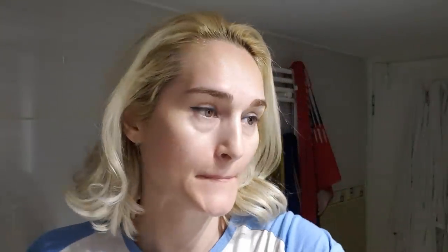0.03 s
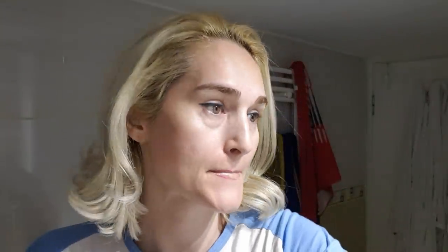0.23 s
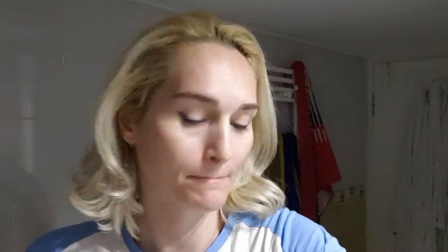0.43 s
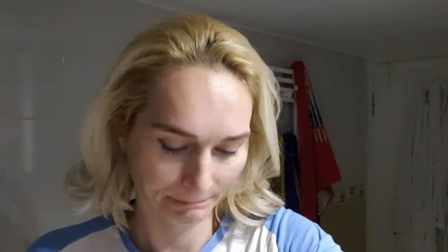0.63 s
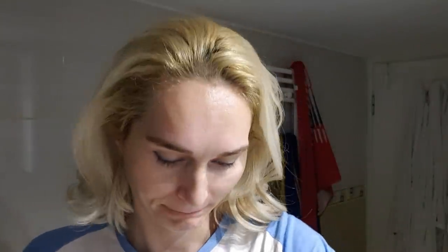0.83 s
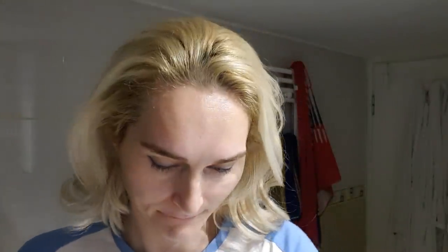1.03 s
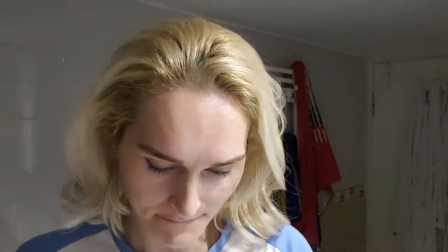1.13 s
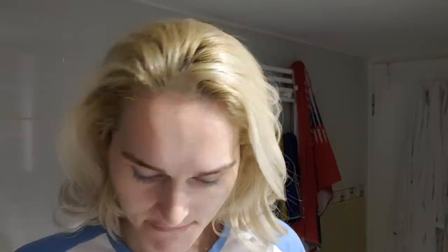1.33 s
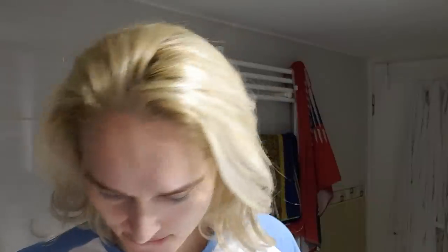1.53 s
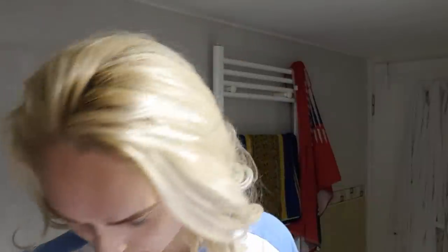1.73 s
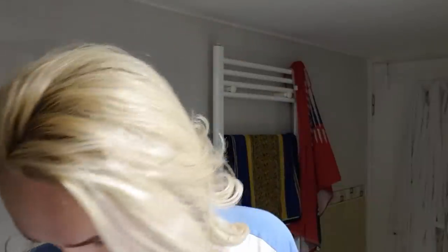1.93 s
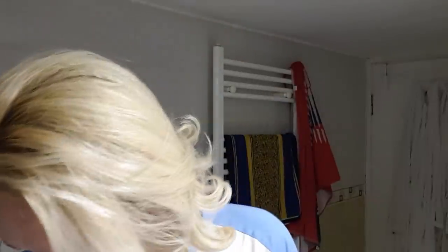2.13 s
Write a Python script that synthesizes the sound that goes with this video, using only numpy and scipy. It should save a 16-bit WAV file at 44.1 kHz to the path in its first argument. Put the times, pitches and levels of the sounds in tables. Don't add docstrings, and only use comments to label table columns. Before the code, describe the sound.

Bright irregular plastic clicks tumble quickly through a basin, knock its rim and stand, pause for a soft heel thud, then land and bounce on hard tiles. Close stereo pickup in a small echoing bathroom with faint hum.

```python
import sys
import numpy as np
from scipy import signal
from scipy.fft import rfft, irfft, next_fast_len
from scipy.io import wavfile
from scipy.ndimage import map_coordinates

SR = 44100
rng = np.random.default_rng(int(sys.argv[2]) if len(sys.argv) > 2 else 0)


def output_pcm(signal):
    pcm = np.clip(np.atleast_2d(signal).T, -1, 1) * 32767
    wavfile.write(sys.argv[1], SR, np.round(pcm).astype(np.int16))


def gain_from_decibels(decibels):
    exponent = np.asarray(decibels, float) / 20
    return 10 ** exponent


N = 95564

# start in seconds, cup level in dB, then basin boom, body and rim in dB over cup.
RATTLE = [(0.018, -45.5, -10.5, -10, -21.5), (0.0327, -33, -31, -5, -8),
          (0.0404, -23.5, -20.5, -0.5, -10.5), (.062, -34, 3, 6.5, 4.5), (0.0759, -23, -6, 7.5, -2.5),
          (.0815, -21.5, -7.5, -9.5, -17), (0.097, -32.5, 9, -2, -8.5), (0.1279, -12.5, -13, -2.5, -34),
          (0.1521, -8.5, -25.5, -4, -7), (.1597, -10.5, -21.5, -3, -18), (0.1881, -22.5, -8, -9, -17),
          (0.2144, -15.5, -12, 1, -6), (0.244, -38, 11.5, 6.5, -13), (0.27, -48.5, 17, -31.5, -18.5),
          (0.347, -61, -11, 1, -5), (0.506, -35.5, 2, 11.5, -4), (0.548, -36.5, -19.5, 7, 3.5)]
# centre in Hz, width in Hz, level in dB.
CUP_SIDE = [(3300, 290, -1.5), (3600, 500, 4.5), (4550, 570, 6.5), (5100, 500, 6.5), (5627, 830, 3.5),
            (8130, 1500, -2.5)]
# centre in Hz, width in Hz, level in dB.
BASIN_BODY = [(999, 46, 14), (1400, 87, 4.5), (1789, 91, 8), (2592, 800, 2.5), (3440, 710, 2)]
# centre in Hz, width in Hz, level in dB.
RIM = [(8686, 2580, -2), (10980, 900, 2), (11640, 660, 1.5), (12640, 2500, -7)]
IN_BASIN = dict(direct_db=(2, 2), walls_db=-18, chatter_db=9, tail_db=2, build=.015)


def rattle_in_basin(out):
    for s, db, boom_db, body_db, rim_db in RATTLE:
        strike(out, s, db, CUP_SIDE, boom_db, BASIN_BODY, body_db, RIM, rim_db, -22.5, IN_BASIN)


# start in seconds, cup level in dB, then boom, body and rim in dB over cup.
EDGE = [
    (0.482, -34.5, -5, -5.5, 9.5),
    (.488, -46, 16, 20, -2.5),
    (0.5701, -14.5, -18, -3.5, 3.5),
    (0.614, -35.5, -21.5, -7.5, -5),
    (0.759, -52, -3.5, 7.5, 1),
]
# centre in Hz, width in Hz, level in dB.
CUP_FLANK = [(3990, 530, 4.5), (4660, 500, 7.5), (5440, 940, 2.5), (6620, 550, -1)]
# centre in Hz, width in Hz, level in dB.
RIM_END_ON = [(9460, 1200, -1), (10460, 540, 5), (12100, 2700, -2.5)]
# centre in Hz, width in Hz, level in dB.
LIP = [(700, 100, 0), (955, 430, -2), (1540, 270, 6), (2420, 1100, 4), (3350, 770, -5.5)]
ON_EDGE = dict(direct_db=(2, 5), walls_db=2, chatter_db=7, tail_db=9, build=.02)


def knock_on_edge(out):
    for s, db, boom_db, body_db, rim_db in EDGE:
        strike(out, s, db, CUP_FLANK, boom_db, LIP, body_db, RIM_END_ON, rim_db, -15, ON_EDGE)


# start in seconds, cup level in dB, then flat crack, body and rim in dB over cup.
STAND = [
    (0.861, -10, -9.5, -35, 3.5),
    (.897, -22.5, -7, -22, -8.5),
]
# centre in Hz, width in Hz, level in dB.
CUP_TOP = [(4140, 990, 0.5), (5070, 720, 6.5), (5770, 700, 4), (7880, 1800, 0.5)]
ON_STAND = dict(direct_db=(1, 6), walls_db=3, chatter_db=2, tail_db=12, build=.012)


def knock_on_stand(out):
    for s, db, crack_db, body_db, rim_db in STAND:
        strike(out, s, db, CUP_TOP, -31.5, LIP, body_db, RIM, rim_db, crack_db, ON_STAND)


# start in seconds, cup level in dB, then flat crack, tile and rim in dB over cup.
SKIPS = [
    (1.429, -11.5, -1, -20, 9),
    (1.576, -50, 4, 4, -10),
    (1.7214, -20, -7.5, -10, 3),
    (2.1023, -12, -10, -34, 4.5),
]
# centre in Hz, width in Hz, level in dB.
TILE = [(1110, 260, 6), (1720, 320, 5.5), (2300, 350, 1)]
ON_TILES = dict(direct_db=(-10, -4), walls_db=1, chatter_db=-2, tail_db=13.5, build=.006)


def skip_on_tiles(out):
    for s, db, crack_db, tile_db, rim_db in SKIPS:
        boom_db = -56 - db
        strike(out, s, db, CUP_TOP, boom_db, TILE, tile_db, RIM, rim_db, crack_db, ON_TILES, body_order=2)


# centre in Hz, width in Hz, level in dB.
BOOM = [(120, 99, 10.5), (250, 240, 14), (412.1, 34.5, 30.5), (540, 22, -8)]


def strike(out, s, db, cup, boom_db, body, body_db, rim, rim_db, crack_db, spot, body_order=1):
    def colour(f):
        crack = (f / (850 ** 4 + f ** 4) ** .25) ** 4
        return causal(peaks(cup, f) ** 2,
                      gain_from_decibels(boom_db) * peaks(BOOM, f),
                      gain_from_decibels(body_db) * peaks(body, f) ** body_order,
                      gain_from_decibels(rim_db) * peaks(rim, f) ** 2,
                      gain_from_decibels(crack_db) * crack)

    add(out, s, gain_from_decibels(db + 10) * filtered(room(**spot), colour))


def cap():
    out = np.zeros((2, N))
    rattle_in_basin(out)
    knock_on_edge(out)
    knock_on_stand(out)
    skip_on_tiles(out)
    return out


# centre in Hz, width in Hz, level in dB.
HEEL = [(118.3, 56, 9), (332, 20.4, 22.5), (940, 170, 8.5), (1400, 180, 3.5), (1990, 520, -11.5),
        (4640, 1000, 3)]


def heel():
    def soft(f):
        return causal(*[peaks([mode], f) / (1 + (f / 2000) ** 4) for mode in HEEL])

    out = np.zeros((2, N))
    push = room(direct_db=(-8, -8), walls_db=-2, chatter_db=1, tail_db=8, build=.018)
    add(out, 1.105, gain_from_decibels(-12) * filtered(push, soft))
    return out


# start in seconds, length in seconds, centre in Hz, width in Hz, level in dB.
SLIDES = [
    (.765, .1, 2800, 200, -63),
    (.53, .45, 190, 200, -62),
    (.58, .28, 14500, 4000, -66),
]


def scrape():
    out = 0
    for s, length, hz, width, db in SLIDES:
        progress = np.clip((np.arange(N) / SR - s) / length, 0, 1)
        noise = filtered(pair(N), lambda f: peaks([(hz, width, 0)], f) ** 2)
        out = out + gain_from_decibels(db) * noise / noise.std() * np.sin(np.pi * progress)
    return out


# delay in seconds, left level in dB, right level in dB.
WALLS = [(.0016, -7, -9), (.0052, 0, 3), (.0068, -2, -7), (.0086, -2, -8), (.0125, -7, -6), (.0155, -5, -7),
         (.021, -7, -7)]
# frequency in Hz, time to fall 60 dB in seconds.
ROOM_T60 = [(150, .4), (500, 0.24), (1500, 0.32), (5000, 0.27), (10000, 0.24), (16000, 0.15)]


def room(direct_db, walls_db, chatter_db, tail_db, build):
    n = 3 * SR // 5
    hz, frame_s, bins = signal.stft(pair(n), SR, nperseg=256)
    decay = gain_from_decibels(-60 * frame_s / along(ROOM_T60, hz)[:, None])
    tail = signal.istft(bins * decay, SR, nperseg=256)[1][:, :n]
    t = np.arange(n) / SR
    spiky = gain_from_decibels(4.5 * np.exp(-t / .04) * rng.standard_normal((2, n)))
    tail = tail * (1 - np.exp(-t / build)) * spiky
    chatter_t60 = .023
    chatter = pair(n) * gain_from_decibels(-60 * t / chatter_t60) * (1 - np.exp(-t / .001))
    out = tail / np.linalg.norm(tail[0]) * gain_from_decibels(tail_db)
    out += chatter / np.linalg.norm(chatter[0]) * gain_from_decibels(chatter_db)

    paths = [(0, *direct_db)] + [(s, left + walls_db, right + walls_db) for s, left, right in WALLS]
    luck = [[1, 1], *rng.standard_normal((len(WALLS), 2))]
    lag_s, place_db = .0006, 1.5
    for (s, *db), g in zip(paths, luck):
        at = [round((s + lag_s) * SR), round(s * SR)]
        out[[0, 1], at] += gain_from_decibels(np.add(db, place_db * (np.abs(g) - 1))) * np.sign(g)
    return out


# frequency in Hz, density in dB per Hz.
HISS = [(25, -10), (86, -13), (200, 2), (330, -16), (480, -19), (2000, -29.5), (7500, -28.5), (12000, -22),
        (16000, -33.5)]
# frequency in Hz, level in dB rms.
HUM = [(102.3, -82), (199.2, -79), (247.6, -88), (301.5, -86)]


def stillness():
    hiss = filtered(pair(N), lambda f: gain_from_decibels(along(HISS, f)))
    t = np.arange(N) / SR

    def sway():
        return map_coordinates(rng.standard_normal(40), [t * 9])

    hum = sum(gain_from_decibels(db + 5.3 * sway()) * np.sin(2 * np.pi * hz * t + 0.84 * sway()) for hz, db in HUM)
    return gain_from_decibels(-72) * hiss / hiss.std() + hum


def pair(n):
    middle, b = rng.standard_normal((2, n))
    alike_hz = 500
    side = filtered(b, lambda f: np.sqrt(.15 + .85 * f ** 2 / (f ** 2 + alike_hz ** 2)))
    return np.array([middle + side, middle - side])


def peaks(table, f):
    return sum((-1) ** k * gain_from_decibels(db) * 1j * f * width / (hz * hz - f * f + 1j * f * width)
               for k, (hz, width, db) in enumerate(table))


def causal(*parts):
    power = sum(np.abs(p) ** 2 for p in parts)
    cepstrum = irfft(np.log(power + 1e-12) / 2)
    half = len(cepstrum) // 2
    cepstrum[1:half] *= 2
    cepstrum[half + 1:] = 0
    return np.exp(rfft(cepstrum))


def filtered(x, response):
    n = x.shape[-1]
    m = 2 * next_fast_len(n // 2 + 4096)
    return irfft(rfft(x, m) * response(np.fft.rfftfreq(m, 1 / SR)), m)[..., :n]


def along(points, hz):
    f, v = np.transpose(points)
    return np.interp(np.log(hz + 1), np.log(f + 1), v)


def add(out, s, sound):
    i = round(s * SR)
    out[:, i:i + sound.shape[1]] += sound[:, :out.shape[1] - i]


def scene():
    return cap() + heel() + scrape() + stillness()


def band_limit(x):
    return signal.sosfilt(signal.butter(12, 16600, fs=SR, output="sos"), x)


# frequency in Hz, left over right in dB.
PORTS = [(60, 0), (350, 9), (700, -2.5), (3000, -3.5), (5000, -3), (10000, -12), (16000, -6)]


def record(dry):
    def ports(f):
        balance = along(PORTS, f) * np.array([[.5], [-.5]])
        return gain_from_decibels(balance) / (1 + (f / 16250) ** 60)

    x = filtered(dry, ports)
    mix = x / (1 + np.abs(x) ** 6) ** (1 / 6)
    return band_limit(mix)


dry = scene()
out = record(dry)
output_pcm(out)
```